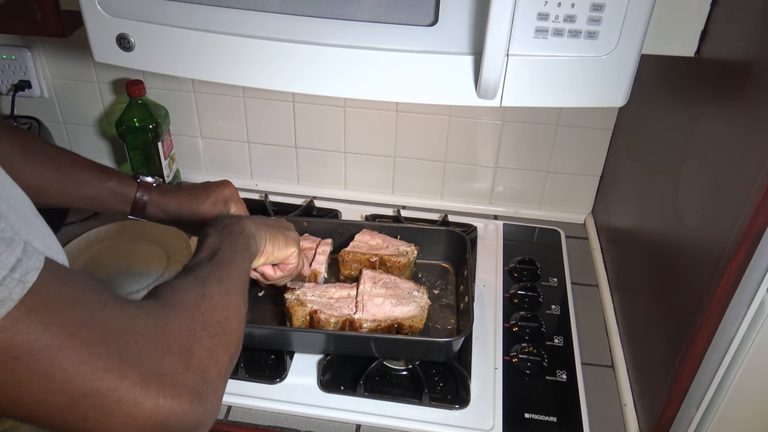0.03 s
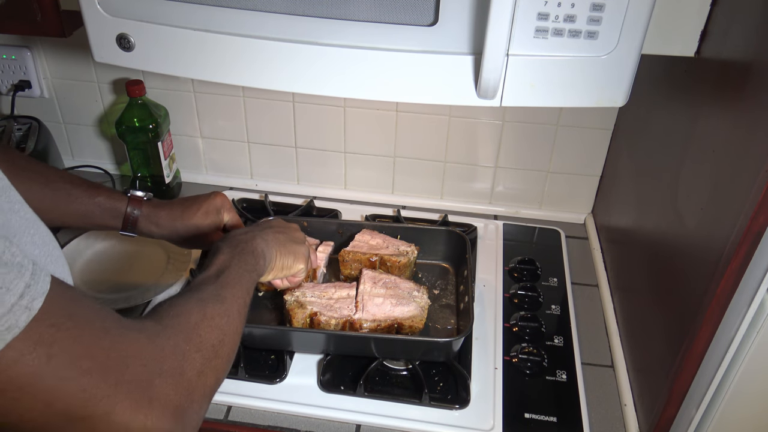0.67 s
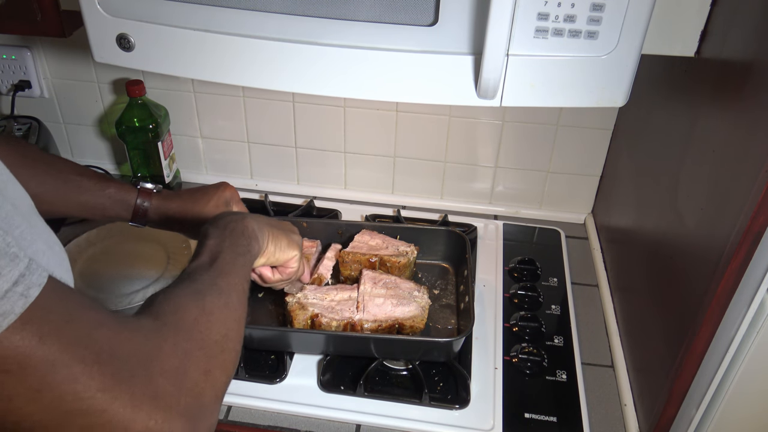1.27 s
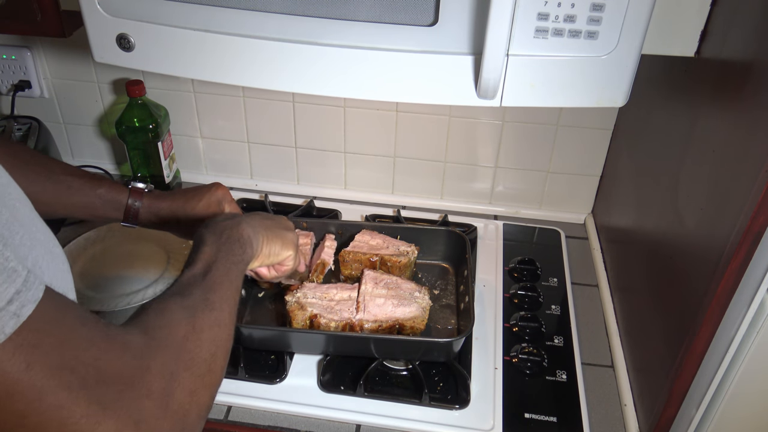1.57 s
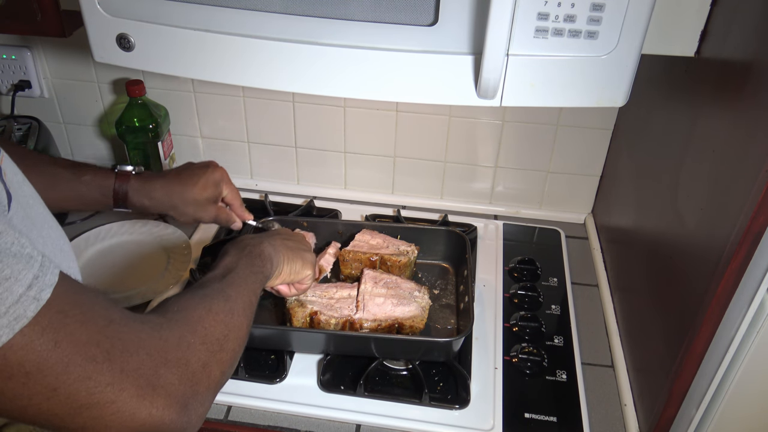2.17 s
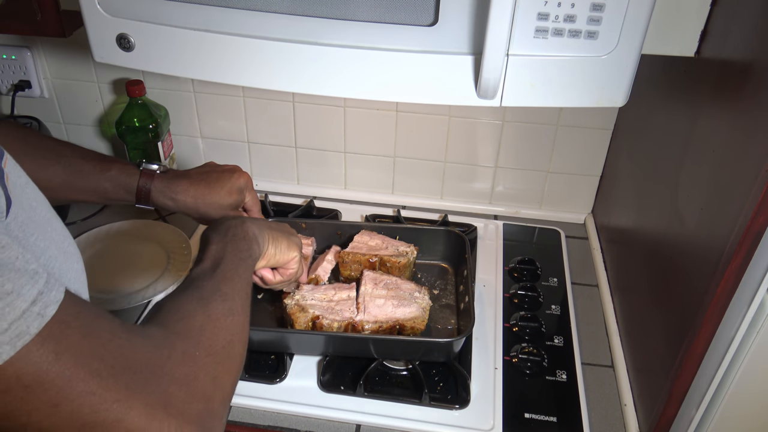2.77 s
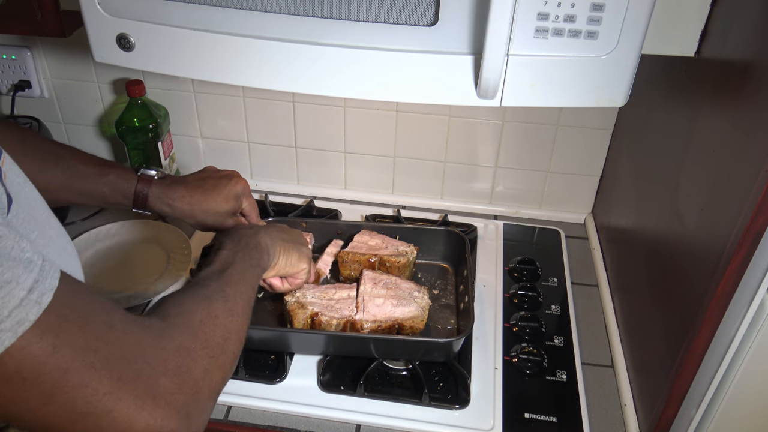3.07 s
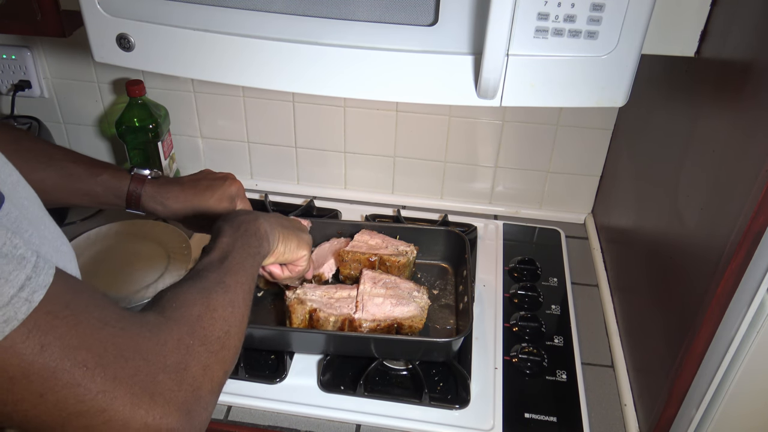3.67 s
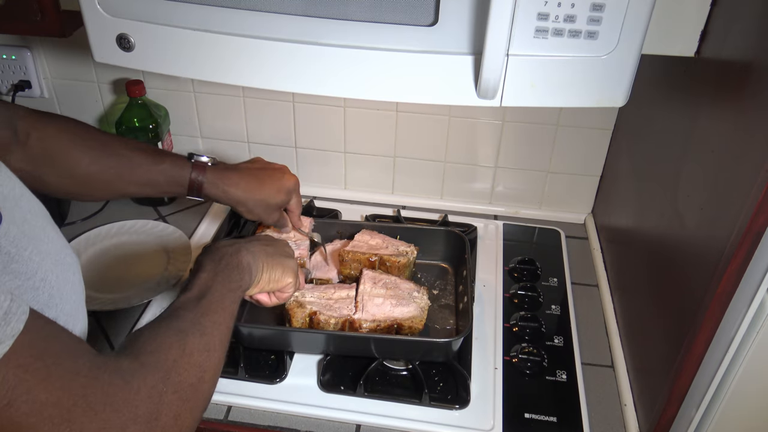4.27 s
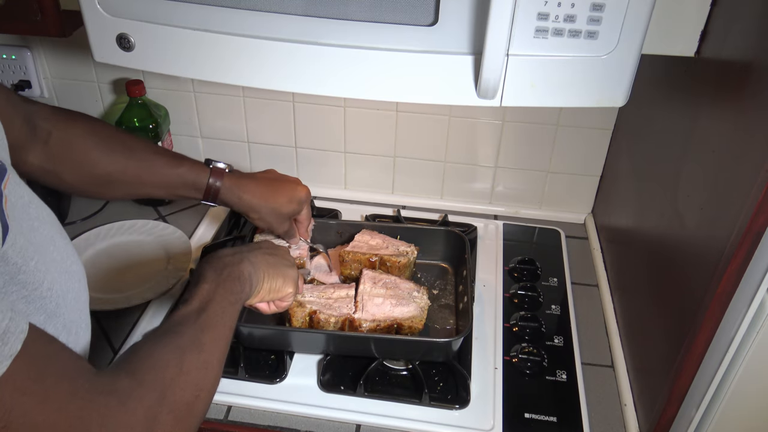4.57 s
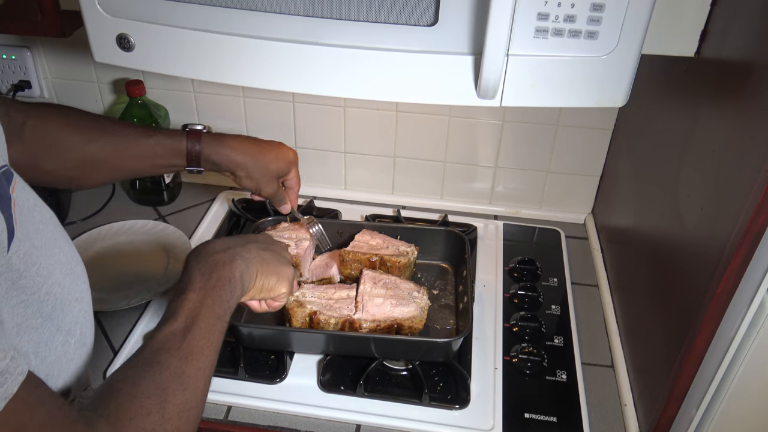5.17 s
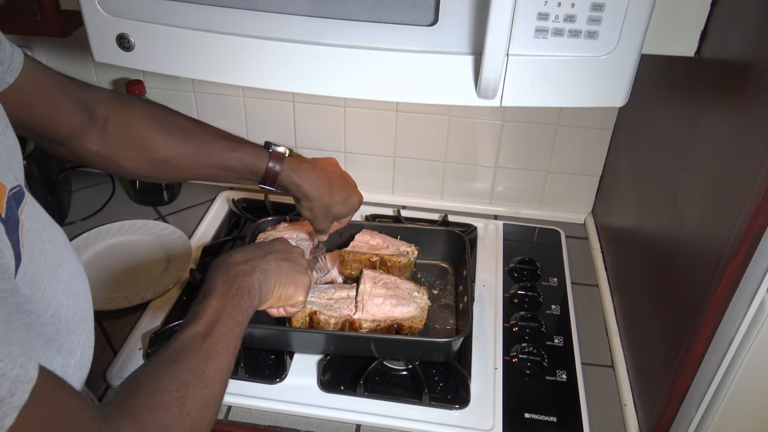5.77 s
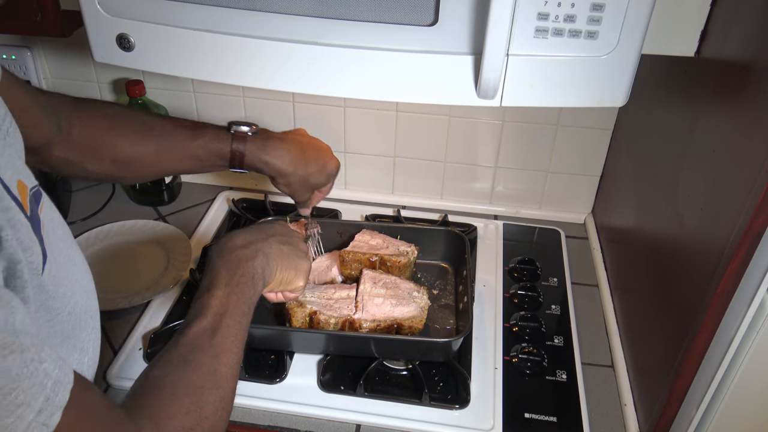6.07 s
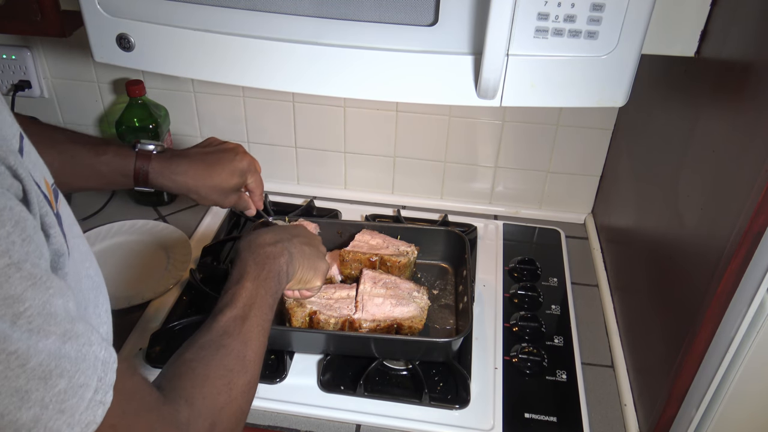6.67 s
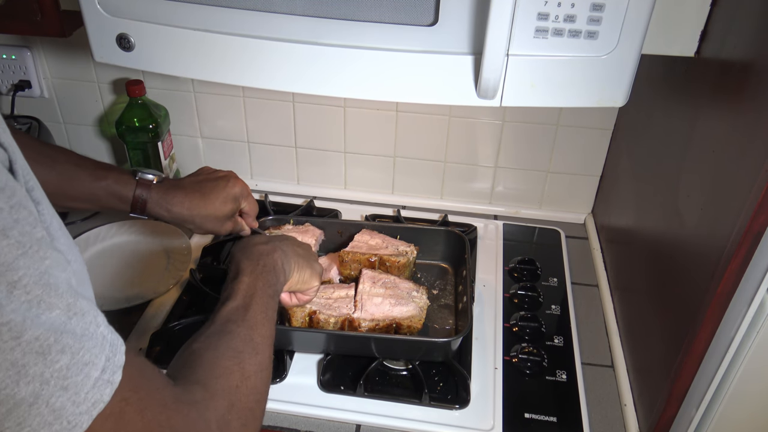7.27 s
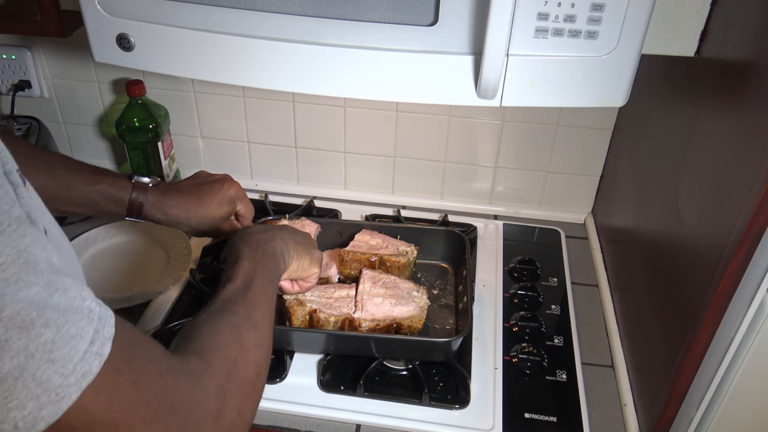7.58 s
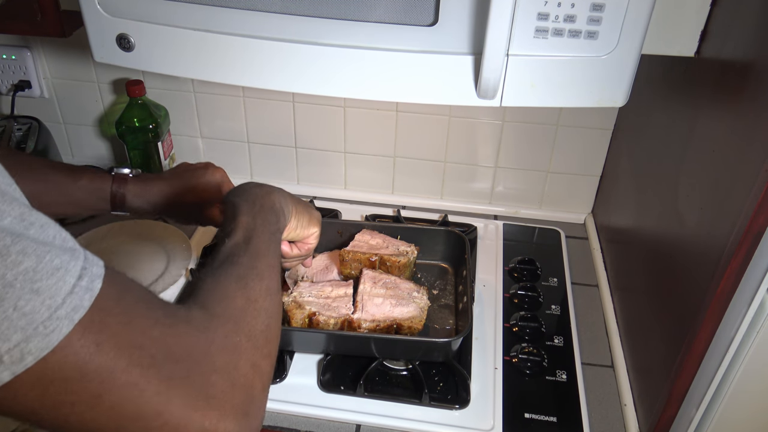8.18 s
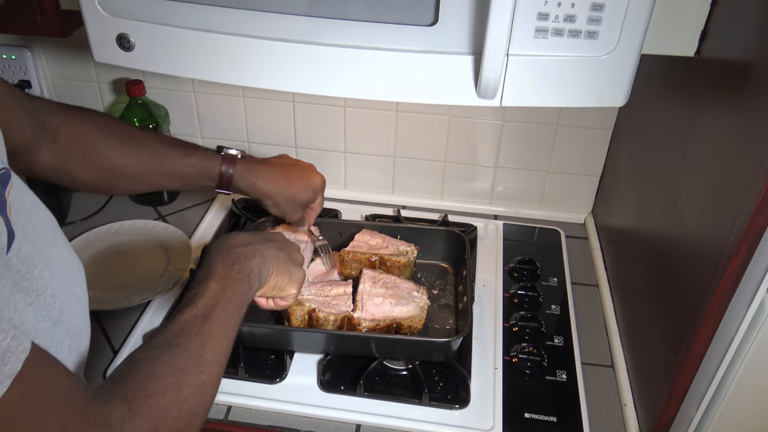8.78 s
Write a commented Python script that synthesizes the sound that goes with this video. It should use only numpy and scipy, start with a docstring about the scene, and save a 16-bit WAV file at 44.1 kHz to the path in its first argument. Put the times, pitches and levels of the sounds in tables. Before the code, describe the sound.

A knife and fork carve meat in a metal roasting pan, which knocks and scrapes on the stove between clinks of cutlery.

```python
"""A small kitchen: roast meat is carved with knife and fork in a metal pan on a stove.
The pan knocks and drags on the burner grate and rings; the blade scrapes its bottom. Parting fibres
crackle and tick, the knife clinks and slides on the fork, and shoves rock the stove over the room tone.
Tiled walls add a short tail. A limiter ducks after the loudest knocks."""
import sys
import numpy as np
from scipy import signal
from scipy.fft import rfft, irfft, next_fast_len
from scipy.io import wavfile
from scipy.ndimage import uniform_filter1d

SR = 44100
rng = np.random.default_rng(int(sys.argv[2]) if len(sys.argv) > 2 else 0)


def unload_audio(sound):
    """Save the sound as a 16-bit wav file, at the path given as the first command line argument."""
    columns = np.transpose(np.atleast_2d(sound))
    # keep every value between -1 and 1, then stretch to whole-number steps
    steps = np.round(np.clip(columns, -1, 1) * 32767)
    wavfile.write(sys.argv[1], SR, steps.astype(np.int16))


N = 388962
TIME = np.arange(N) / SR
AGE = TIME[:SR * 3 // 5]  # time axis of one event, 0.6 s

# knife strokes: start/s, swell/s, hold/s, pan drag/dB, blade rasp/dB, grinding pitch/Hz
STROKES = [(0.768, 0.0096, 0.1, -10.5, -15, 806), (0.959, 0.029, 0.052, -27.5, -27.5, 950),
           (2.031, 0.011, 0.14, -6, -8, 1024), (2.513, 0.03, .015, -35.5, -36, 1436),
           (2.565, 0.03, .04, -33, -29, 1190), (2.655, 0.0032, 0.03, -11, -16, 1100),
           (2.91, .005, 0.05, -22, -30.5, 770), (2.968, 0.047, 0.036, -44, -32.5, 950),
           (3.097, 0.036, 0.062, -32, -29, 930), (3.55, 0.05, 0.12, -25.5, -37, 880),
           (7.028, 0.014, 0.05, -9, -19.5, 920), (7.104, .01, 0.033, -24, -35, 930),
           (7.147, 0.094, .05, -28.5, -24.5, 1000), (7.272, 0.0048, 0.065, -7.5, -12.5, 1100),
           (7.461, 0.0095, 0.13, -28.5, -32.5, 700), (7.646, 0.043, 0.037, -28.5, -31, 710),
           (7.715, 0.047, 0.0074, -15.5, -16.5, 1430), (7.961, 0.075, 0.0079, -23.5, -28, 970)]
# pan sheet modes: f/Hz, level/dB, t60/s
PAN_MODES = [(385, -14, .14), (455, -13, .14), (576, -1, .21), (602, 1, .21), (645, -2, .18), (685, 0, .14),
             (795, -2, .16), (892, -4, .14), (968, -3, .17), (1005, -5, .14), (1139, -5, .17),
             (1245, -6, .15), (1309, 0, .18), (1335, -2, .14), (1577, -11, .16), (1722, -9, .16),
             (1873, -13, .16)]
# steel contact spectrum: f/Hz, level/dB
STEEL_SPECTRUM = [(1180, 3), (2000, 0.5), (2820, -3.5), (3110, -2.5), (4710, -2.5), (5610, -3),
                  (7750, -14.5), (8500, -20.5), (10700, -24), (13900, -64), (22000, -120)]
# rumble spectrum: f/Hz, level/dB
RUMBLE_SPECTRUM = [(22, 3.5), (33, 2.5), (60, -7.5), (95, -7), (160, -20), (300, -22)]


def from_db(db):
    """Decibels to gain."""
    return 10 ** (np.asarray(db) / 20)


def rms_one(x):
    """Scale to rms 1."""
    return x / np.sqrt(np.mean(x ** 2) + 1e-20)


def attack_one(x):
    """Scale to rms 1 over the first 10 ms."""
    return x / np.sqrt(np.mean(x[:SR // 100] ** 2) + 1e-20)


def decay(t60_s):
    """Envelope losing 60 dB in t60_s."""
    return np.exp(-np.log(1000) * AGE / max(t60_s, .002))


def add(track, t_s, sound):
    """Mix a sound into the track at t_s."""
    start = max(round(t_s * SR), 0)
    track[start:start + len(sound)] += sound[:N - start]


def through(x, response):
    """Drive a body or a room with a signal."""
    return signal.fftconvolve(x, response)[:len(x)]


def colour(x, spectrum):
    """Impose a smooth spectrum with steep skirts; rms 1."""
    hz, db = np.transpose(spectrum)
    size = next_fast_len(len(x))
    bins_hz = np.maximum(np.fft.rfftfreq(size, 1 / SR), 1)
    skirts = np.minimum(bins_hz / hz[0], 1) ** 2 * np.minimum(hz[-1] / bins_hz, 1) ** 2
    gain = from_db(np.interp(np.log(bins_hz), np.log(hz), db))
    return rms_one(irfft(rfft(x, size) * skirts * gain, size)[:len(x)])


def wash(spectrum, t60_s):
    """Crowded modes dying together, as decaying noise."""
    return attack_one(colour(rng.standard_normal(len(AGE)), spectrum) * decay(t60_s))


def ring(modes, spread_db):
    """Distinct modes; each contact point weights them anew."""
    out = 0
    for hz, db, t60_s in modes:
        weight = from_db(db + spread_db * rng.standard_normal()) * rng.choice([-1, 1])
        out = out + weight * np.sin(2 * np.pi * hz * AGE) * decay(t60_s)
    return attack_one(out)


def slips(per_s, spread_db, size=N):
    """Stick-slip friction: random clicks of uneven strength; rms 1."""
    strength = from_db(spread_db * np.minimum(rng.exponential(1, size), 4))
    return rms_one((rng.random(size) < per_s / SR) * strength * rng.choice([-1, 1], size))


def grains(clicks, t60_s):
    """Turn each click into a decaying noise burst."""
    pole = from_db(-120 / (max(t60_s, .001) * SR))
    power = signal.lfilter([1], [1, -pole], clicks ** 2 + 1e-18)
    return rng.standard_normal(N) * np.sqrt(power)


def tilted(rows, db_per_octave, low_hz=510, high_hz=1780):
    """Hard contact favours high modes, soft contact low ones; pivot 1 kHz."""
    return [(hz, db + db_per_octave * np.log2(np.clip(hz, low_hz, high_hz) / 1000), *rest)
            for hz, db, *rest in rows]


def moving_resonance(x, pitch_hz, width_octaves):
    """Stress the bands near a moving pitch; rms 1."""
    out, edges_hz = 0, np.geomspace(400, 2800, 11)
    for low, high in zip(edges_hz, edges_hz[1:]):
        band = signal.sosfilt(signal.butter(2, [low, high], "band", fs=SR, output="sos"), x + 1e-18)
        offset_octaves = np.log2(np.sqrt(low * high) / pitch_hz)
        out = out + rms_one(band) * np.exp(-(offset_octaves / width_octaves) ** 2)
    return rms_one(out)


def background():
    """Room tone over a low rumble, drifting together in level."""
    # drift: t/s, level/dB
    drift = [(0.0, -44), (1.7, -45), (5.2, -40.5), (8.82, -42.5)]
    # room tone: f/Hz, level/dB
    room_spectrum = [(50, -2), (90, -0.5), (170, -5), (500, -10.5), (1600, -18.5), (3000, -21.5),
                     (5200, -23), (10700, -30.5)]
    t_s, db = np.transpose(drift)
    room_tone = colour(rng.standard_normal(N), room_spectrum)
    rumble = colour(rng.standard_normal(N), RUMBLE_SPECTRUM)
    return from_db(np.interp(TIME, t_s, db)) * (room_tone + rumble)


def reflections(x, t60_s=0.44, first_echo_s=0.0034):
    """Close tiled walls return a short dense tail."""
    wall_spectrum = [(90, 4.5), (600, -2.0), (5000, 1.5), (11000, -5.0)]  # f/Hz, level/dB
    tail = wash(wall_spectrum, t60_s) * (AGE > first_echo_s)
    return through(x, tail / np.linalg.norm(tail))


def stove(rise_s=0.029, t60_s=0.87):
    """Shoves rock the stove: a rumble builds and dies."""
    # shoves: t/s, level/dB
    shoves = [(0.77, -17.5), (2.08, -24), (4.87, -28), (7.171, -24)]
    rocking = np.zeros(N)
    for t_s, db in shoves:
        add(rocking, t_s, from_db(db) * (1 - np.exp(-AGE / rise_s)) * decay(t60_s))
    return rocking * colour(rng.standard_normal(N), RUMBLE_SPECTRUM)


def meat(width_ratio=1.25, skirt_db=-13):
    """Parting fibres crackle wetly with blade speed; the tools add clearer ticks."""
    # blade passes, fastest halfway: start/s, length/s, mid-pass level/dB
    cuts = [(0, .2, -41), (0.784, 0.79, -40.5), (2.846, 0.68, -37), (3.35, 0.59, -41), (4.4, 0.79, -58),
            (7.15, .14, -21.5), (7.356, 0.39, -34), (7.9, 0.24, -37.5)]
    # crackle: f/Hz, level/dB
    crackle_spectrum = [(710, -4), (1200, 0.5), (3670, -3.5), (5290, -2), (5750, 1.5), (6650, -4.5),
                        (10700, -11), (13900, -52), (22000, -120)]
    # tools in the meat: t/s, level/dB, f/Hz
    ticks = [(0.166, -36, 5370), (1.029, -21, 3640), (1.1907, -32, 6300), (1.3636, -33, 6000),
             (1.446, -45, 3970), (3.251, -27, 4430), (3.4336, -29, 3600), (3.496, -27, 3530),
             (3.989, -38.5, 5060), (4.187, -40.5, 5800), (4.6533, -43, 3500), (4.682, -36.5, 6500),
             (4.7547, -42, 4930), (4.866, -42, 4330), (4.8984, -32.5, 5350), (6.109, -37, 6300),
             (8.4338, -38.5, 4040), (8.739, -35.5, 5740)]
    speed = np.zeros(N)
    for t_s, length_s, db in cuts:
        add(speed, t_s, from_db(db) * np.sin(np.linspace(0, np.pi, int(length_s * SR))))
    crackle = grains(slips(per_s=750, spread_db=2.5), t60_s=0.026)
    out = speed * colour(crackle, crackle_spectrum)
    for t_s, db, hz in ticks:
        hump = [(hz / width_ratio ** 2, skirt_db), (hz / width_ratio, skirt_db / 2),
                (hz, 0), (hz * width_ratio, skirt_db)]
        add(out, t_s, from_db(db) * wash(hump, t60_s=0.078))
    return from_db(-3.5) * out


def fork_clinks():
    """Knife taps ring the tines."""
    # taps: t/s, level/dB, relative tine ring/dB
    taps = [(4.361, -28.5, -27), (5.597, -30.5, -25), (5.615, -34, -27), (5.7657, -13.5, -2.5),
            (5.794, -14.5, -9), (6.049, -30, -25), (6.167, -25, -11), (6.172, -17.5, -2.5)]
    # tine modes: f/Hz, level/dB, t60/s
    fork_modes = [(2433, -7, .24), (2870, -2, .2), (2950, -1, .14), (3332, -10, .22), (3930, -11, .2),
                  (4385, -1, .38), (5035, -9, .26), (5138, -8, .26), (5722, -4, .22), (5800, -4, .2),
                  (6840, -7, .28), (7106, -8, .22), (8000, -11, .2), (9170, -16, .25)]
    # crowded fork modes: f/Hz, level/dB
    fork_spectrum = [(820, -34), (1400, -4), (2110, 4), (2910, 9), (3760, 2), (4340, 6.5), (4690, 7),
                     (5950, 5.5), (10700, -5), (13900, -47), (22000, -120)]
    out = np.zeros(N)
    for t_s, db, ring_db in taps:
        tines = from_db(ring_db) * ring(fork_modes, spread_db=0.5)
        add(out, t_s, from_db(db) * (tines + from_db(-2) * wash(fork_spectrum, t60_s=0.16)))
    return out


def knife_slides():
    """The blade chatters off the tines; its lowest note sinks slide by slide as the contact moves."""
    # slides: t/s, level/dB, length/s, contact pitch/Hz
    slides = [(6.351, -3.5, 0.018, 2840), (6.374, -10, 0.018, 2650), (6.416, -8, 0.0086, 2540),
              (6.441, -22, 0.0089, 2440)]
    # blade modes: f/Hz, level/dB, t60/s
    knife_modes = [(4280, -14, .25), (5114, -7, .25), (5696, -5, .2), (5870, -8, .14), (6856, -8, .26),
                   (8005, -13, .16), (8700, -9, .08), (9577, -8, .1), (10470, -12, .14)]
    # crowded blade modes: f/Hz, level/dB
    knife_spectrum = [(1000, -56.5), (1700, -44), (1910, -17.5), (2640, 0), (3850, -11.5), (4220, -8),
                      (4730, -13), (5870, 1), (6390, -11), (6850, -1.5), (10700, -11), (13900, -50),
                      (22000, -120)]
    out = np.zeros(N)
    for t_s, db, length_s, hz in slides:
        chatter = slips(per_s=1600, spread_db=-1, size=len(AGE)) * (AGE < length_s)
        blade = ring([(hz, 3, .11), *knife_modes], spread_db=1.5) + wash(knife_spectrum, t60_s=.04)
        zing = through(chatter / np.linalg.norm(chatter), blade)
        shimmer = wash(knife_spectrum, t60_s=0.33)
        add(out, t_s, from_db(db) * (from_db(-14) * zing + from_db(-13) * shimmer))
    return out


def stroke_force(swell_s, hold_s, swell_power=1.6, sag_db_per_s=18, release_db_per_s=393):
    """Force swells to 1, sags while held, then is let go."""
    swell = np.minimum(AGE / max(swell_s, 1 / SR), 1) ** swell_power
    held_s = np.maximum(AGE - swell_s, 0)
    released_s = np.maximum(held_s - hold_s, 0)
    return swell * from_db(-sag_db_per_s * held_s - release_db_per_s * released_s)


def sawing(sink_octaves=0.22):
    """Strokes drag the pan over the grate and ring it; the blade rasps on its bottom."""
    # grit of pan on grate: f/Hz, level/dB
    grit_spectrum = [(88, -6.5), (150, -7.5), (267, -16), (435, -4), (545, -12), (596, 0), (775, -5),
                     (971, -0.5), (1090, -9), (1310, -3.5), (1480, -11.5), (3000, -23), (3900, -83),
                     (6600, -120)]
    drag, rasp, weighted_hz = np.zeros((3, N))
    for t_s, swell_s, hold_s, drag_db, rasp_db, hz in STROKES:
        force = stroke_force(swell_s, hold_s)
        stroke_hz = hz * 2 ** (sink_octaves * (force - 1))  # less force, lower pitch
        add(drag, t_s, from_db(drag_db) * force)
        add(rasp, t_s, from_db(rasp_db) * force)
        add(weighted_hz, t_s, from_db(drag_db) * force * stroke_hz)
    moving = drag > 0
    pitch_hz = np.interp(TIME, TIME[moving], weighted_hz[moving] / drag[moving])
    grinding = moving_resonance(slips(per_s=600, spread_db=3), pitch_hz, width_octaves=0.47)
    sheet = ring(PAN_MODES, spread_db=-1.5) * decay(t60_s=0.19)  # damped by the tools
    singing = rms_one(through(grinding, sheet))
    grip = from_db(1.3 * colour(rng.standard_normal(N), [(25, 0), (90, 0)]))  # catches and lets go
    grit = colour(slips(per_s=900, spread_db=2), grit_spectrum)
    scraping = colour(grains(slips(per_s=2500, spread_db=1), t60_s=0.012), STEEL_SPECTRUM)
    pan = from_db(-3.5) * singing + from_db(-5.5) * grinding + from_db(-3) * grit
    return drag * grip * pan + rasp * scraping


def pan_knocks(rise_s=0.0018, free_t60_s=0.1, pressed_t60_s=0.033, pressed_within_s=0.03):
    """The pan hits the grate: clatter, sheet ring, stove-top thump. A stroke's push damps the clatter."""
    # knocks: t/s, level/dB, relative treble/dB, relative thump/dB, hardness tilt/(dB/octave)
    knocks = [(0.736, -30.5, -27, -25, -3), (0.768, 2.5, -8.5, -21.5, -2.5), (0.839, -0.5, -7, -14.5, -1.5),
              (1.274, -39.5, 6.5, -27, -4), (1.841, -28, -14, -31, 5), (2.025, 4.5, -5, -37, 3),
              (2.640, -2, -3, -15, -1), (2.903, -8.5, -34, -33, 1.5), (3.196, -10, -12, -22.5, 0.5),
              (3.694, -16, -10.5, -18.5, 0), (4.087, -21, -12.5, -32, -9), (4.362, -27.5, -16, -16, 2),
              (4.417, -20, -9, -32, -1), (4.898, -35.5, 0.5, -9, 2), (5.65, -32, -8, -16, -1),
              (5.767, -12, -26, -22, -7.5), (6.571, -13.5, -14.5, -11.5, -4), (7.016, 2.5, -15, -30, 3),
              (7.022, 0.5, -29, -20.5, 6), (7.269, 1, -5, -16.5, -6), (7.319, -3, -24, -10.5, 3.5),
              (7.459, -13.5, -24, -23, -8), (7.769, -12, -17, -33, 18), (7.816, -13, -10, -9, -9),
              (7.863, -11.5, -15, -11, -1), (7.903, -7, -18, -23, 1), (8.211, -6, -8, -15, -1.5),
              (8.222, -11.5, -25, -20.5, -9.5)]
    # crowded pan modes: f/Hz, level/dB
    pan_spectrum = [(130, -12), (220, -13.5), (490, -3.5), (600, 0.5), (770, -3), (970, 5), (1180, -5.5),
                    (1320, 0), (1500, -4.5), (2500, -13), (3600, -20)]
    # stove-top modes: f/Hz, level/dB, t60/s
    stove_modes = [(93, -9, .3), (120, -7, .18), (139, 0, .26), (168, -3, .18), (245, -4, .14),
                   (305, -4, .14), (345, -7, .14)]
    out = np.zeros(N)
    contact = 1 - np.exp(-AGE / rise_s)
    for t_s, db, treble_db, thump_db, tilt in knocks:
        pressed = any(abs(start_s - t_s) < pressed_within_s for start_s, *_ in STROKES)
        t60_s = pressed_t60_s if pressed else free_t60_s
        spectrum = tilted(pan_spectrum, tilt)
        clatter = from_db(-6) * wash(spectrum, t60_s) + from_db(-17.5) * wash(spectrum, t60_s=0.23)
        sheet = from_db(-9) * ring(tilted(PAN_MODES, tilt), spread_db=4)
        treble = from_db(-6) * wash(STEEL_SPECTRUM, t60_s) + from_db(-5) * wash(STEEL_SPECTRUM, 0.15)
        thump = ring(stove_modes, spread_db=2.5)
        knock = clatter + sheet + from_db(treble_db) * treble + from_db(thump_db) * thump
        add(out, t_s, from_db(db) * contact * knock)
    return out


def scene():
    """Carving, its reflections, stove and background; mono."""
    direct = pan_knocks() + sawing() + fork_clinks() + knife_slides() + meat()
    return (direct + from_db(-11) * reflections(direct) + stove() + background())[None]


def record(dry, threshold_db=-10, attack_s=0.0053, release_db_per_s=40, cutoff_hz=10900):
    """A limiter ducks after loud blows; first peaks clip; a low-pass cuts the top."""
    power = uniform_filter1d(dry[0] ** 2, size=128, origin=63)
    over_db = np.maximum(10 * np.log10(np.maximum(power, 1e-12)) - threshold_db, 0)
    release_db = release_db_per_s * TIME
    held_db = np.maximum.accumulate(over_db + release_db) - release_db
    pole = np.exp(-1 / (attack_s * SR))
    ducked = dry * from_db(-signal.lfilter([1 - pole], [1, -pole], held_db))
    lowpass = signal.ellip(10, .2, 70, cutoff_hz, fs=SR, output="sos")
    return signal.sosfilt(lowpass, np.clip(ducked, -.95, .95))


dry = scene()
out = record(dry)
unload_audio(out)
```